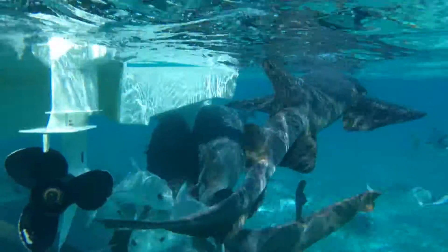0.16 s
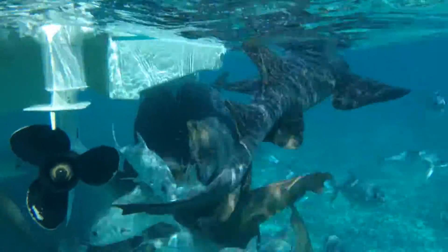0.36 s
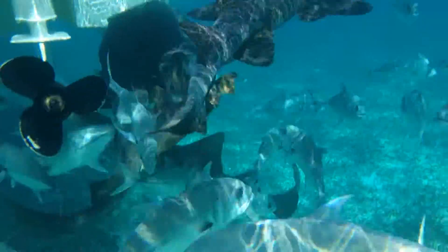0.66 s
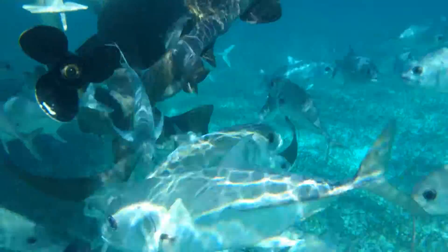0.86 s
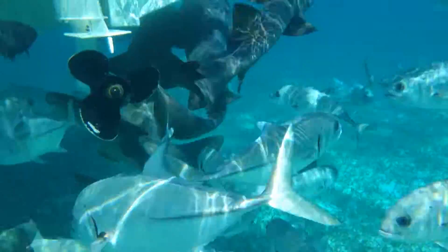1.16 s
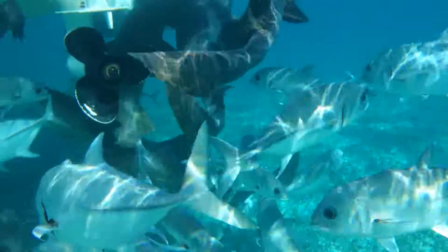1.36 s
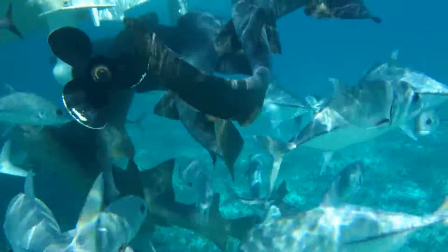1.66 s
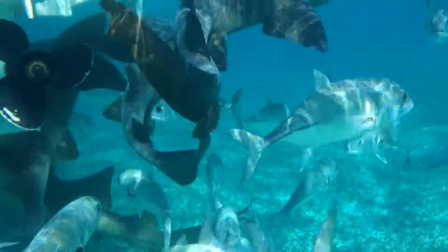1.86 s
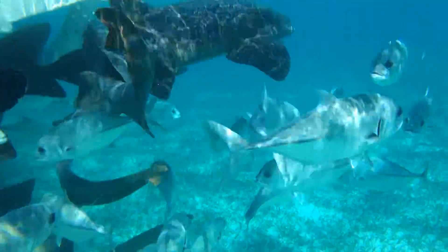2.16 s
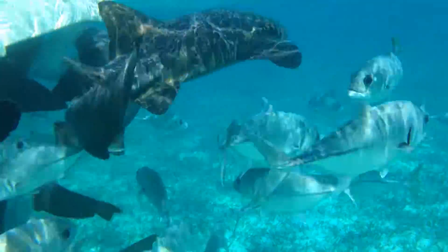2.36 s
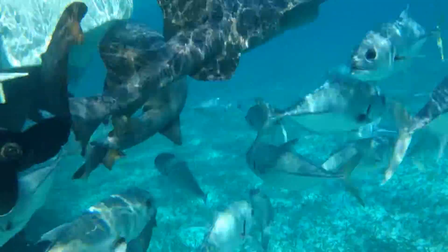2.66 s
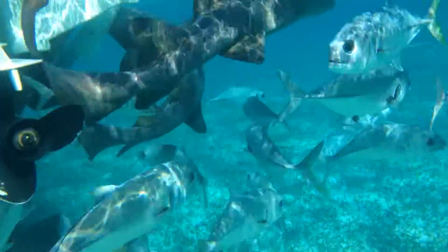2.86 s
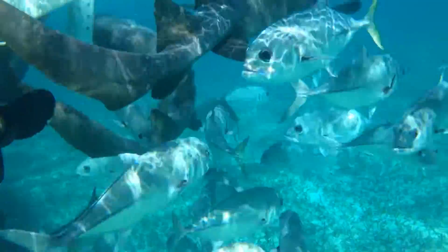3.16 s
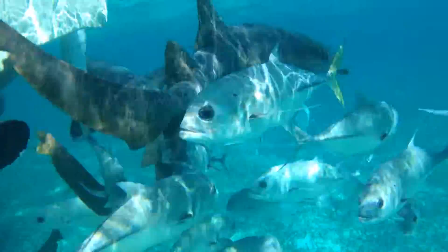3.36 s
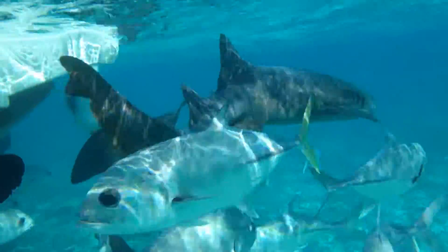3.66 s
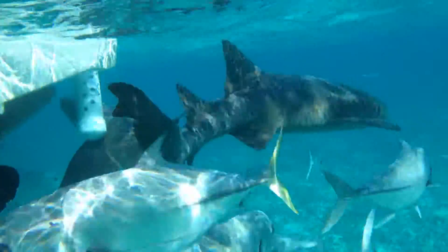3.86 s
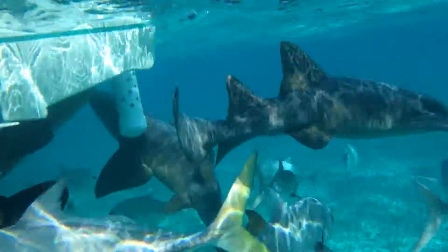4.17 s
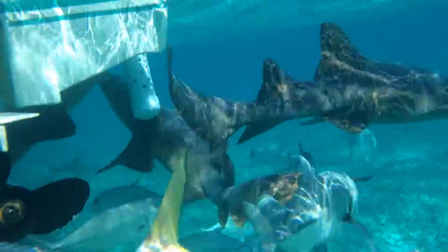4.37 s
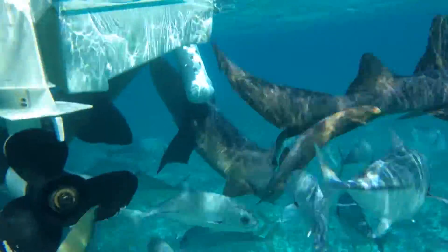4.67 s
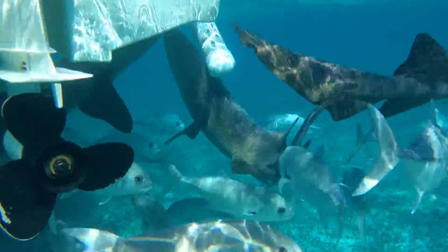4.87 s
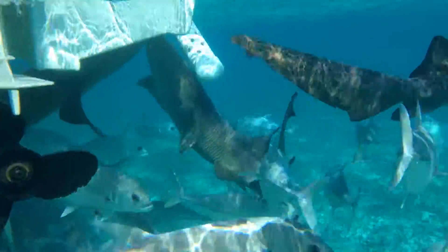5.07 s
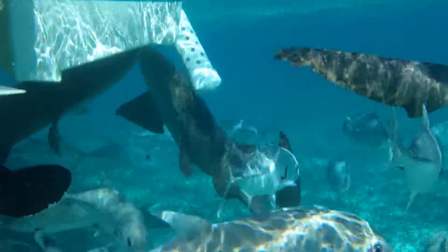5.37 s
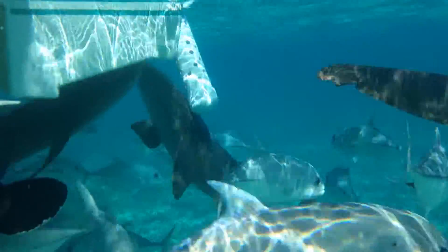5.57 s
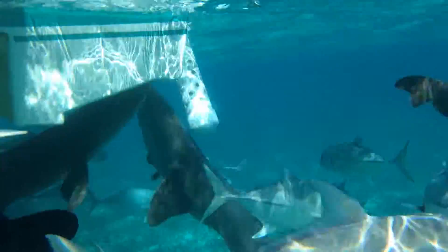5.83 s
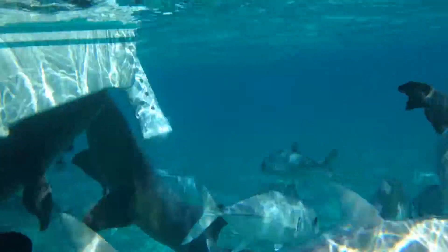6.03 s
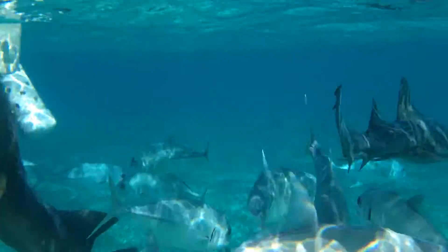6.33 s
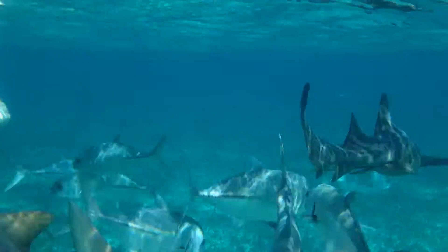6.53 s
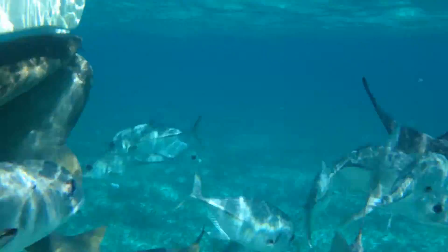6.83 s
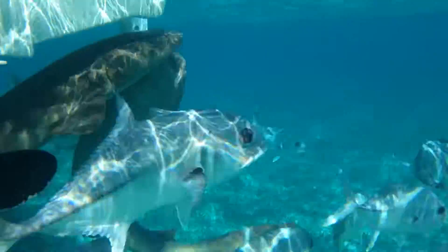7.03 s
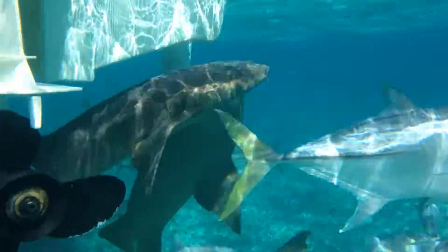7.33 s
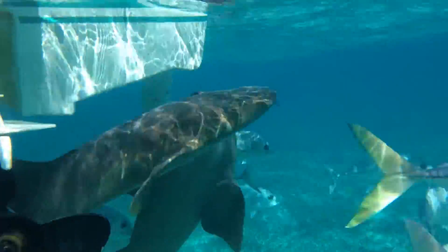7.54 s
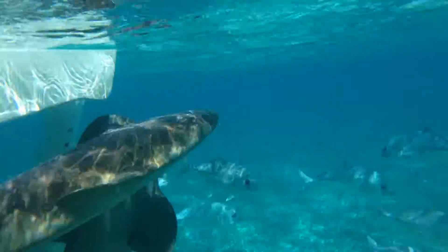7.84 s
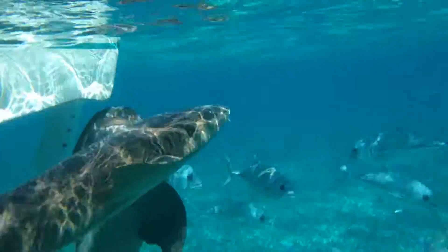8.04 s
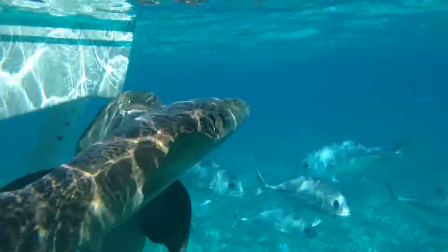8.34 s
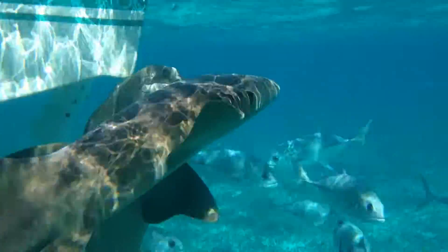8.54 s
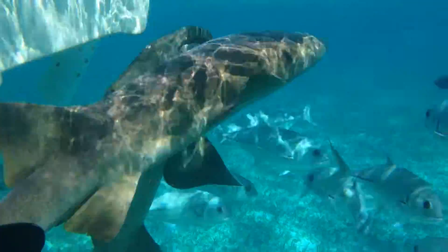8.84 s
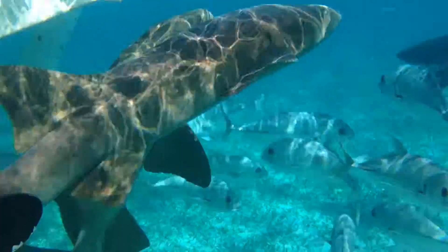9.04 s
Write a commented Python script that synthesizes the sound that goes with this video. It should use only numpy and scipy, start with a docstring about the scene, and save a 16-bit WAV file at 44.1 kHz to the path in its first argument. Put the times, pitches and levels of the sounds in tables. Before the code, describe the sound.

An idling boat engine knocks and hums underwater, with water washing around the hull and a few low gulps of bubbles.

```python
"""An idling boat diesel, heard under water, knocks and hums through the hull, swelling and dipping in level.
Water washes around the hull. Three big gulps of air ring low and break into trails of bubbles. A few contacts
tick and bump on the camera housing; single bubbles ring, and a faint, high sizzle sounds once."""
import sys
import numpy as np
from scipy import signal
from scipy.fft import rfft, irfft
from scipy.io import wavfile
from scipy.ndimage import uniform_filter1d, minimum_filter1d, map_coordinates

SR = 44100
rng = np.random.default_rng(int(sys.argv[2]) if len(sys.argv) > 2 else 0)


def wav_record(signal):
    """Record a signal, one row per channel, as 16-bit PCM in the file named by sys.argv[1]."""
    frames = np.transpose(np.atleast_2d(signal))
    bounded = np.clip(frames, -1, 1)
    # unit amplitude maps onto the largest positive 16-bit level
    quanta = np.round(bounded * 32767).astype(np.int16)
    wavfile.write(sys.argv[1], SR, quanta)


N = 405719


def amp(db):
    """Decibels to gain."""
    return 10 ** (np.asarray(db) / 20)


def unit(x):
    """Scale to rms 1."""
    return x / np.sqrt(np.mean(x ** 2) + 1e-20)


def curves(rows):
    """One value per sample for each column after the time."""
    times_s, *columns = np.transpose(rows)
    return [np.interp(np.arange(N) / SR, times_s, column) for column in columns]


def wobble(rate_hz):
    """Smooth random curve, rate_hz knots a second."""
    knots = rng.standard_normal(int(N * rate_hz / SR) + 4)
    coarse = np.arange(0, N + 20, 20)
    return np.interp(np.arange(N), coarse, map_coordinates(knots, [coarse * rate_hz / SR]))


def coloured(x, spectrum, size=8192):
    """Minimum-phase filter from (frequency [Hz], gain [dB]) points; output rms 1."""
    hz, db = np.transpose(spectrum)
    gain = amp(np.interp(np.log(np.fft.rfftfreq(size, 1 / SR) + 1), np.log(hz), db))
    cepstrum = irfft(np.log(gain))
    cepstrum[1:size // 2] *= 2
    cepstrum[size // 2 + 1:] = 0
    impulse_response = irfft(np.exp(rfft(cepstrum)))
    return unit(signal.fftconvolve(x, impulse_response)[:N])


def add(track, start_s, sound):
    """Mix a sound into the track."""
    part = track[max(round(start_s * SR), 0):][:len(sound)]
    part += sound[:len(part)]


def ring(hz, t60_s, attack_s):
    """One resonance, of an air pocket or the housing, swells and rings down; peak 1."""
    t = np.arange(int(t60_s * SR) + 2) / SR
    tone = np.sin(2 * np.pi * hz * t) * amp(-60 * t / t60_s) * (1 - np.exp(-t / attack_s))
    return tone / np.abs(tone).max()


# Engine speed: (time [s], working cycles [1/s])
ENGINE_SPEED = [(0.0, 9.725), (0.66, 9.772), (1.31, 9.764), (1.97, 9.894), (2.63, 9.67), (3.29, 9.686),
                (3.94, 9.795), (4.6, 9.709), (5.26, 9.785), (5.91, 9.802), (6.57, 9.715), (7.23, 9.72),
                (7.89, 9.732), (8.54, 9.768), (9.2, 9.798)]
def engine_cycles():
    """Working cycles elapsed at each sample."""
    return np.cumsum(curves(ENGINE_SPEED)[0]) / SR


# Twelve evenly spaced knocks per cycle, from two sides of the stern: (side A [dB], side B [dB])
KNOCK_PATTERN = [(0.3, 2.3), (-1.5, 0), (-1.5, -0.1), (1, 0.5), (0.5, 1.4), (-1, 4.5), (0, 4.5), (-0.2, -5),
                 (-2.5, 1.5), (-2.2, -3), (-1.4, -1.5), (-2.7, 1.2)]
# Listener's drift: (time [s], share of side B [0-1])
DRIFT = [(3.5, 0), (6.2, 0.5)]
def blow_strengths(cycle):
    """Gain of each knock: the pattern at the listener's position, plus scatter."""
    index = np.arange((int(cycle[-1]) + 2) * len(KNOCK_PATTERN))
    a_db, b_db = np.array(KNOCK_PATTERN)[index % len(KNOCK_PATTERN)].T
    side = np.interp(index / len(KNOCK_PATTERN), cycle, curves(DRIFT)[0])
    scatter_db = 0.8 * rng.standard_normal(len(index))
    return amp(a_db + side * (b_db - a_db) + scatter_db)


def knocking(cycle, blows, spectrum, decay_knocks, floor, repeat_share, lead_cycles):
    """Each knock is a noise burst in the hull; part of its grain recurs every cycle; rms 1."""
    position = (cycle + lead_cycles) * len(KNOCK_PATTERN)
    envelope = floor + np.exp(-(position % 1) / decay_knocks)
    mean_rate_hz = np.mean(np.transpose(ENGINE_SPEED)[1])
    grain = rng.standard_normal(int(SR / mean_rate_hz))
    recurring = grain[(cycle % 1 * len(grain)).astype(int)]
    noise = np.sqrt(repeat_share) * recurring + np.sqrt(1 - repeat_share) * rng.standard_normal(N)
    return coloured(noise * blows[position.astype(int)] * envelope, spectrum)


# Engine level, swelling and dipping every few seconds: (time [s], level [dB])
SWELL = [(0.0, 0.2), (0.47, -1.1), (0.64, -9.5), (1.03, -12.5), (1.55, 0.8), (2.39, 3), (2.91, 4.1),
         (3.4, 0.65), (4.15, 2.5), (4.69, 3), (5.5, -2.5), (6.14, 1.5), (6.72, -3.0), (7.23, 1.5),
         (7.89, -1.2), (8.65, 2.5), (8.85, 5), (9.2, 1.8)]
def path_gain(base_db, swell_depth, balance, balance_depth):
    """Gain of one engine band: follows the common swell and a balance curve; depths in dB/dB."""
    return amp(base_db + swell_depth * curves(SWELL)[0] + balance_depth * curves(balance)[0])


# Drone band: (frequency [Hz], gain [dB])
DRONE_SPECTRUM = [(120, -63.5), (175, -29.5), (225, -8), (280, -11.5), (380, -10.5), (455, 1), (540, -2),
                  (600, -2.5), (670, -11.5), (800, -31.5), (1300, -64.5), (4600, -100)]
# Drone balance: (time [s], level [dB])
DRONE_BALANCE = [(0.0, -0.3), (1.19, -0.6), (2.76, -4), (3.81, -4.7), (4.19, -0.5), (5.1, -5), (5.69, -1.3),
                 (6.41, 0.4), (7.6, 6.5), (8.19, 6.6), (9.2, 4.5)]
def drone(cycle, blows):
    """Slowly decaying knocks merge into a low drone."""
    gain = path_gain(base_db=-30.5, swell_depth=0.88, balance=DRONE_BALANCE, balance_depth=1.05)
    return gain * knocking(cycle, blows ** 0.5, DRONE_SPECTRUM,
                           decay_knocks=0.93, floor=0.28, repeat_share=0.25, lead_cycles=0.03)


# Boom band: (frequency [Hz], gain [dB])
BOOM_SPECTRUM = [(400, -71), (600, -19.5), (665, -3.5), (715, 1.5), (765, 2.5), (820, -6.5), (900, -21.5),
                 (1300, -65.5), (3000, -105)]
# Boom balance: (time [s], level [dB])
BOOM_BALANCE = [(0.0, 3), (0.34, 4.5), (1.08, -3), (2.76, -2.5), (3.33, -1.8), (3.909, 0.7), (4.76, -2),
                (6.02, -2), (6.2, 2), (6.898, 2.5), (7.66, 5.5), (8.91, 2), (9.2, 1)]
def boom(cycle, blows):
    """Knocks boom through the hull near 750 Hz."""
    gain = path_gain(base_db=-25, swell_depth=0.54, balance=BOOM_BALANCE, balance_depth=1.14)
    return gain * knocking(cycle, blows ** 1.1, BOOM_SPECTRUM,
                           decay_knocks=0.3, floor=0.39, repeat_share=0.3, lead_cycles=0.028)


# Lower and upper knock resonance: (frequency [Hz], gain [dB])
LOWER_SPECTRUM = [(550, -64), (740, -20), (835, -1), (910, 2), (985, 1.5), (1050, -13), (1300, -48),
                  (2500, -105)]
UPPER_SPECTRUM = [(650, -68), (900, -18.5), (1000, -3), (1080, 1.5), (1150, -3), (1225, -7.5),
                  (1285, -21.5), (1340, -33), (1600, -60), (3000, -105)]
# Midrange lean towards its upper resonances: (time [s], lean [dB])
MID_LEAN = [(0.0, 0.5), (0.35, 3.6), (1.3, 3.5), (1.9, 0.9), (2.45, -1.4), (3.33, -1.9), (4.2, -2.5),
            (4.81, -0.3), (5.4, 0.6), (5.91, 0.7), (6.8, 2), (7.3, -0.3), (8.0, -0.6), (9.2, -2.6)]
def knock(cycle, blows):
    """Short knocks shift their weight between two neighbouring resonances."""
    lower_gain = path_gain(base_db=-24.5, swell_depth=0.96, balance=MID_LEAN, balance_depth=-0.76)
    upper_gain = path_gain(base_db=-23, swell_depth=0.91, balance=MID_LEAN, balance_depth=0.44)
    return sum(gain * knocking(cycle, blows ** 0.88, spectrum,
                               decay_knocks=0.2, floor=0.58, repeat_share=0.28, lead_cycles=0.028)
               for gain, spectrum in ((lower_gain, LOWER_SPECTRUM), (upper_gain, UPPER_SPECTRUM)))


# Clatter band: (frequency [Hz], gain [dB])
CLATTER_SPECTRUM = [(900, -51.5), (1325, -21), (1420, -3.5), (1640, 0), (1900, -9.5), (2100, -6),
                    (2330, -14), (2460, -27), (2850, -29.5), (3700, -53.5), (4050, -45.5), (4600, -60.5),
                    (7000, -85.5)]
def clatter(cycle, blows):
    """Upper-midrange clatter in which the hard blows stand out."""
    gain = path_gain(base_db=-29, swell_depth=1.11, balance=MID_LEAN, balance_depth=1.2)
    return gain * knocking(cycle, blows ** 1.56, CLATTER_SPECTRUM,
                           decay_knocks=0.62, floor=0.63, repeat_share=0.25, lead_cycles=0.02)


# Rattle band: (frequency [Hz], gain [dB])
RATTLE_SPECTRUM = [(1500, -40), (2480, -7), (2820, 2), (3050, 0.5), (3350, -5.5), (3750, -19), (4050, -20),
                   (4450, -26), (7000, -70)]
# Treble balance: (time [s], level [dB])
TREBLE_BALANCE = [(0.0, 1.5), (0.49, 0), (1.21, 4.5), (1.71, -4), (2.9, 0), (3.61, -5), (4.7, 2.8),
                  (5.3, 1.5), (6.02, 3.2), (7.11, 4), (8.0, 1), (9.2, -0.8)]
def rattle(cycle, blows):
    """Knocks rattle thinly near 3 kHz, growing with the treble and the drone."""
    gain = path_gain(base_db=-47, swell_depth=0.8, balance=TREBLE_BALANCE, balance_depth=0.8)
    gain *= amp(0.18 * curves(DRONE_BALANCE)[0])
    return gain * knocking(cycle, blows, RATTLE_SPECTRUM,
                           decay_knocks=0.35, floor=0.64, repeat_share=0.11, lead_cycles=0.026)


# Rasp strokes within a cycle: (position [cycles], width [cycles], level [dB])
RASP_STROKES = [(0.251, .05, -10.5), (0.551, 0.056, -2), (.98, .03, -12)]
# Rasp band: (frequency [Hz], gain [dB])
RASP_SPECTRUM = [(2500, -24), (4000, 7), (4750, -4.5), (5250, 3.5), (5900, -5.5), (6500, -8), (7200, -12.5),
                 (8500, -9.5), (10000, -16.5), (15000, -31.5)]
def rasp(cycle):
    """Dry contact catches unevenly: one main stroke and two weak ones per cycle."""
    strokes = np.zeros(N)
    for position, width, db in RASP_STROKES:
        offset = (cycle - position + 0.5) % 1 - 0.5
        strokes += amp(db) * np.exp(-0.5 * (offset / width) ** 2)
    scrape = (0.5 + strokes) * amp(2.6 * wobble(150))
    gain = path_gain(base_db=-61, swell_depth=1.2, balance=TREBLE_BALANCE, balance_depth=1.02)
    return gain * coloured(scrape * rng.standard_normal(N), RASP_SPECTRUM)


# Strong firing lines: (time [s], level [dB])
ORDER_8 = [(0, -45.5), (1.15, -43.5), (1.4, -56.5), (2.7, -40.5), (4.3, -48), (4.6, -36), (7.05, -35),
           (7.25, -56), (8.55, -40.5), (8.8, -33.5), (9.2, -38)]
ORDER_12 = [(0, -41), (1.6, -49.5), (3.2, -44), (5.6, -37), (6.05, -53), (6.349, -42), (7, -35.4),
            (7.35, -45.5), (7.75, -38.5), (8.7, -40), (9.2, -57)]
ORDER_16 = [(0, -35), (0.75, -48), (2.5, -47), (3.15, -35), (4.3, -35), (4.55, -40), (5.2, -31.5),
            (5.7, -44), (6.05, -33), (6.4, -41), (6.85, -40.5), (7.15, -30.5), (8.3, -32), (9.2, -34)]
# Weak lines: (order [x cycle rate], level [dB])
WEAK_ORDERS = [(4, -57), (9, -55), (20, -49), (24, -53.5)]
def hum(cycle):
    """Firing pulses give low, slightly unsteady lines at multiples of the cycle rate."""
    strong = [(8, curves(ORDER_8)[0]), (12, curves(ORDER_12)[0]), (16, curves(ORDER_16)[0])]
    out = np.zeros(N)
    for order, db in strong + WEAK_ORDERS:
        rms = amp(db + 0.93 * wobble(4.6))
        phase_rad = 2 * np.pi * (order * cycle + rng.random()) + 0.26 * wobble(2.7)
        out += np.sqrt(2) * rms * np.sin(phase_rad)
    return out


def bubble_cloud(count, centre_hz, log_spread, t60_periods, scatter_db):
    """Bubbles of random size ring at random times; rms 1."""
    cloud = np.zeros(N)
    starts_s = rng.uniform(0, N / SR, count)
    for start_s, (detune, strength) in zip(starts_s, rng.standard_normal((count, 2))):
        hz = centre_hz * np.exp(log_spread * detune)
        add(cloud, start_s, amp(scatter_db * strength) * ring(hz, t60_periods / hz, attack_s=0.0019))
    return unit(cloud)


# Churning of the water: (time [s], level [dB])
CHURN = [(0, -6.5), (1.1, -4), (1.6, -3), (2.4, -0.5), (3.1, -3), (3.7, -4.5), (4.7, 3.5), (6.4, -1),
         (7, 4), (7.5, 3.5), (9.2, 3)]
# Rush band: (frequency [Hz], gain [dB])
RUSH_SPECTRUM = [(20, -30), (40, -14.5), (65, -3.5), (90, 0), (135, 1.5), (210, -3), (270, -0.5),
                 (360, -18), (600, -5), (1300, -38.5), (3000, -71.5), (8000, -87.5)]
def wash():
    """Water churns along the hull: a low rush with small bubbles in it."""
    churn_db, = curves(CHURN)
    rush = coloured(rng.standard_normal(N), RUSH_SPECTRUM) * amp(2.3 * wobble(7))
    gurgle = bubble_cloud(count=500, centre_hz=233, log_spread=0.28, t60_periods=9.1, scatter_db=4.5)
    return amp(-35 + 0.65 * churn_db) * rush + amp(-43.5 + churn_db) * gurgle


# Gulps of air: (time [s], level [dB], tilt [dB/octave], trail level [dB], trail t60 [s])
AIR_GULPS = [(0.5346, -8.5, 2, -22.5, 1.03), (3.0664, -7.5, -12, -22.5, 2.4),
             (5.541, -11.5, 3, -21.5, 2.84)]
# Gulp modes, high first: (frequency [Hz], gain [dB], t60 [s], delay [s], attack [s])
AIR_MODES = [(487, 2, 0.036, 0.0029, .0035), (293, 2, 0.066, 0.0044, 0.0058)]
def gulps():
    """Large air pockets ring low, then break into a fading trail of small bubbles."""
    out, trail, t = np.zeros(N), np.zeros(N), np.arange(N) / SR
    pivot_hz = AIR_MODES[-1][0]
    for start_s, db, tilt, trail_db, trail_t60_s in AIR_GULPS:
        for hz, mode_db, t60_s, delay_s, attack_s in AIR_MODES:
            gain = amp(db + mode_db + tilt * np.log2(hz / pivot_hz))
            add(out, start_s + delay_s, gain * ring(hz, t60_s, attack_s))
        age_s = np.maximum(t - start_s, 0)
        trail += np.minimum(age_s / 0.012, 1) * amp(trail_db - 60 * age_s / trail_t60_s)
    cloud = bubble_cloud(count=3000, centre_hz=296, log_spread=0.15, t60_periods=11, scatter_db=1.5)
    return out + trail * cloud


# Hard contacts: (time [s], peak [dB], cutoff [Hz], contact t60 [s])
HARD_CONTACTS = [(1.1478, -24, 5630, .006), (1.312, -20, 4000, 0.0076), (1.3207, -16.5, 6700, 0.0084),
                 (1.337, -31, 7700, 0.0038), (2.4, -22, 2900, .025), (3.0216, -34, 5800, 0.013),
                 (4.534, -25, 12300, 0.084), (6.4625, -28.5, 11700, 0.0076)]
# Housing modes, hard contact: (frequency [Hz], gain [dB], t60 [s])
HARD_MODES = [(1690, 4.5, .005), (2900, 4.5, 0.0053), (4100, -2, 0.0035), (5060, -1.5, 0.004),
              (6960, -9.5, .004), (8400, -8.5, .005), (11100, -11, .005)]
def ticks():
    """Hard contacts excite the housing's high modes with a burst of noise."""
    out, t = np.zeros(N), np.arange(SR // 4) / SR
    housing = sum(amp(db - 60 * t / t60_s) * np.sin(2 * np.pi * hz * t) for hz, db, t60_s in HARD_MODES)
    for start_s, peak_db, cutoff_hz, t60_s in HARD_CONTACTS:
        contact = rng.standard_normal(len(t)) * amp(-60 * t / t60_s)
        lowpass = signal.butter(10, cutoff_hz, fs=SR, output="sos")
        tick = signal.sosfilt(lowpass, signal.fftconvolve(contact, housing))
        add(out, start_s, amp(peak_db) * tick / np.abs(tick).max())
    return out


# Soft contacts: (time [s], level [dB], tilt [dB/octave])
SOFT_CONTACTS = [(1.148, -11.5, -10), (5.192, -11.5, 3.5)]
# Housing modes, soft contact: (frequency [Hz], gain [dB], t60 [s])
SOFT_MODES = [(183, -20.5, .05), (266, 1.5, 0.018), (920, -3.5, 0.1)]
def bumps():
    """Soft contacts ring the housing's low modes."""
    out = np.zeros(N)
    pivot_hz = SOFT_MODES[1][0]
    for start_s, db, tilt in SOFT_CONTACTS:
        for hz, mode_db, t60_s in SOFT_MODES:
            gain = amp(db + mode_db + tilt * np.log2(hz / pivot_hz))
            add(out, start_s, gain * ring(hz, t60_s, attack_s=0.0006))
    return out


# Single bubbles: (time [s], pitch [Hz], peak [dB], t60 [s])
BUBBLES = [(2.0, 240, -24, .15), (2.4, 255, -20, 0.1), (2.48, 97, -30, .25), (3.076, 102, -23.5, 0.099),
           (3.232, 250, -14, 0.046), (3.31, 298, -10, 0.036), (4.533, 6476, -44.5, 0.071),
           (5.614, 331, -14.5, .09), (5.666, 289, -11.5, .06), (5.695, 275, -13.5, 0.054),
           (6.829, 89, -22, 0.23), (6.98, 255, -16.5, 0.031)]
def single_bubbles():
    """Separate air pockets each ring at one pitch."""
    out = np.zeros(N)
    for start_s, hz, peak_db, t60_s in BUBBLES:
        add(out, start_s, amp(peak_db) * ring(hz, t60_s, attack_s=0.0049))
    return out


def sizzle(start_s=2.74, centre_hz=9700, level_db=-62, t60_s=0.55):
    """A narrow band of high noise starts at once and fades."""
    out, t = np.zeros(N), np.arange(SR // 2) / SR
    band = signal.lfilter(*signal.iirpeak(centre_hz, Q=12, fs=SR), rng.standard_normal(len(t)))
    add(out, start_s, unit(band) * amp(level_db - 60 * t / t60_s))
    return out


def scene():
    """Engine, water and housing over a faint steady hiss; mono."""
    hiss = amp(-69) * rng.standard_normal(N)
    cycle = engine_cycles()
    blows = blow_strengths(cycle)
    knocks = sum(band(cycle, blows) for band in (drone, boom, knock, clatter, rattle))
    engine = knocks + rasp(cycle) + hum(cycle)
    water = wash() + gulps() + single_bubbles()
    return (engine + water + ticks() + bumps() + sizzle() + hiss)[None]


def record(dry):
    """Peak limiter, then a steep low-pass."""
    threshold, cutoff_hz = 0.72, 15310
    needed_gain = np.minimum(1, threshold / (np.abs(dry) + 1e-9))
    held_gain = minimum_filter1d(needed_gain, size=400)
    smooth_gain = uniform_filter1d(uniform_filter1d(held_gain, size=200), size=200)
    lowpass = signal.ellip(12, 0.1, 90, cutoff_hz, fs=SR, output="sos")
    return signal.sosfilt(lowpass, dry * smooth_gain)


dry = scene()
out = record(dry)
wav_record(out)
```